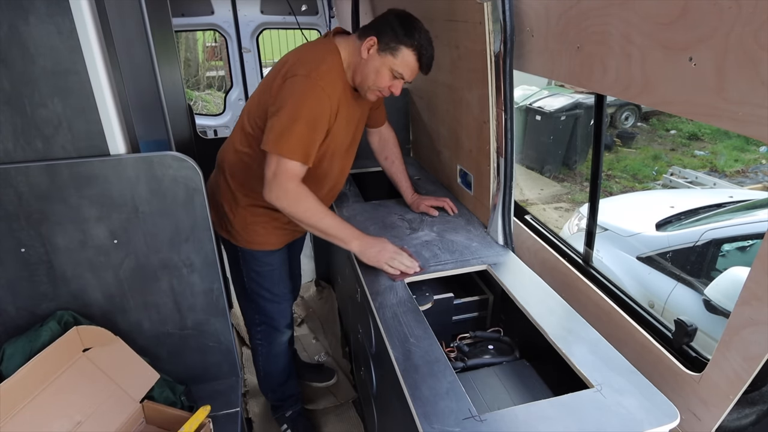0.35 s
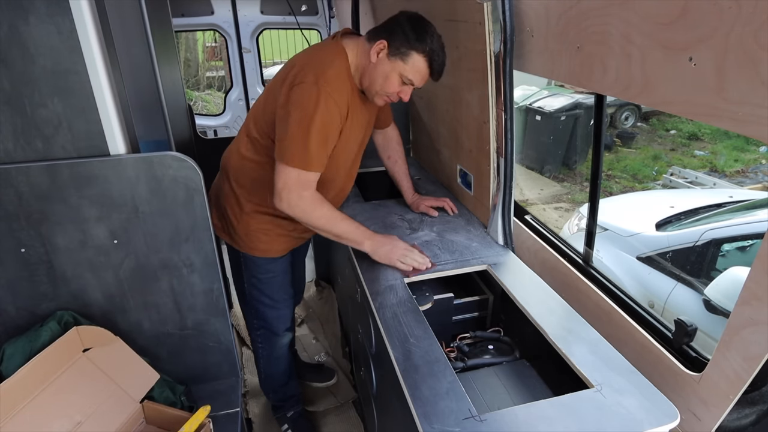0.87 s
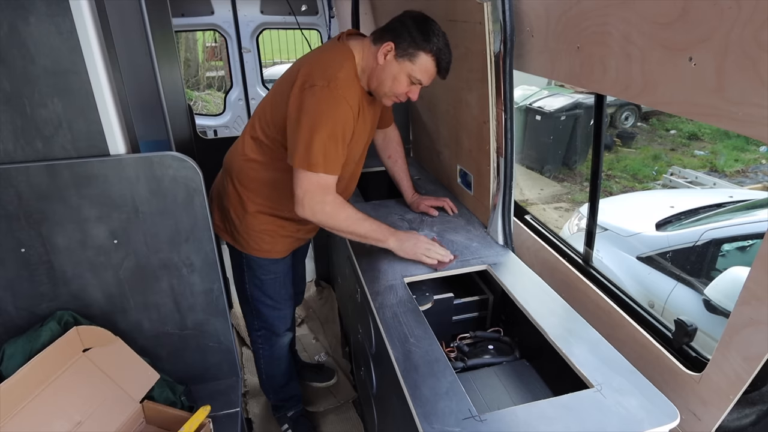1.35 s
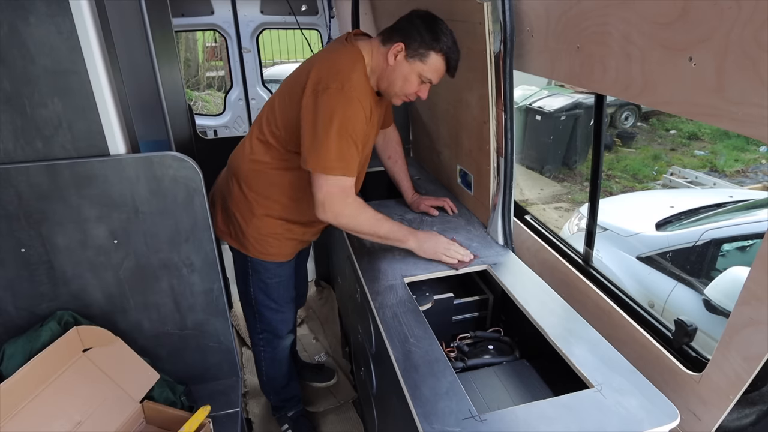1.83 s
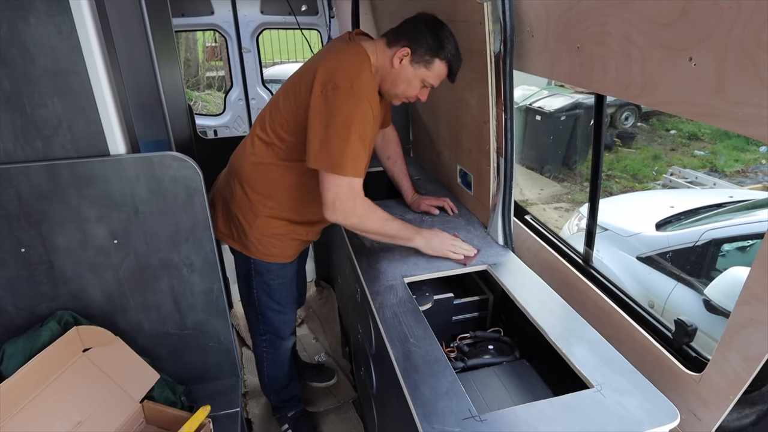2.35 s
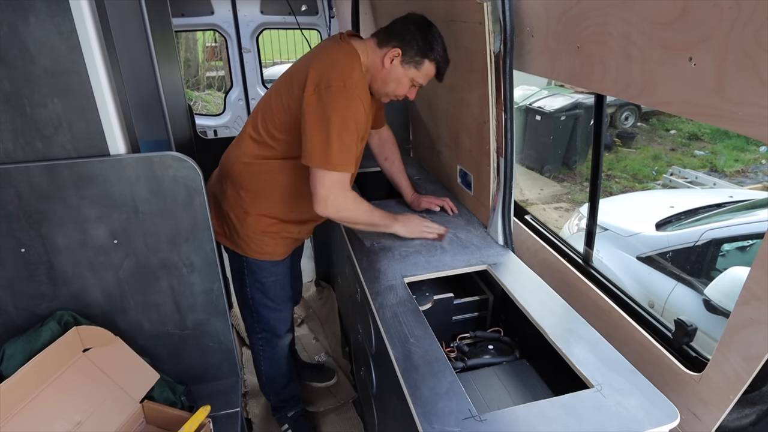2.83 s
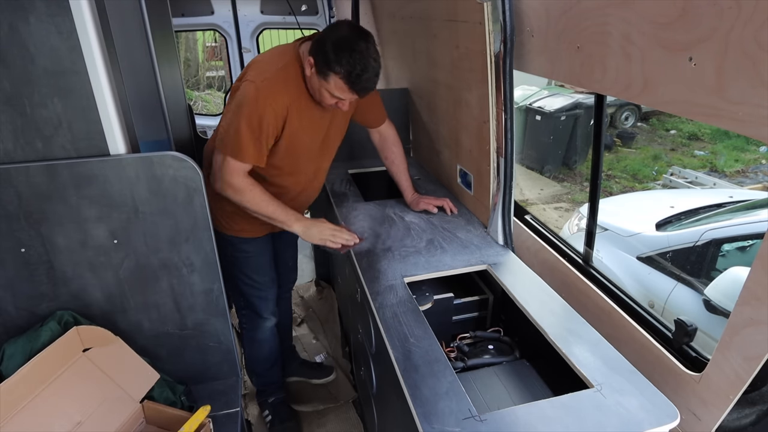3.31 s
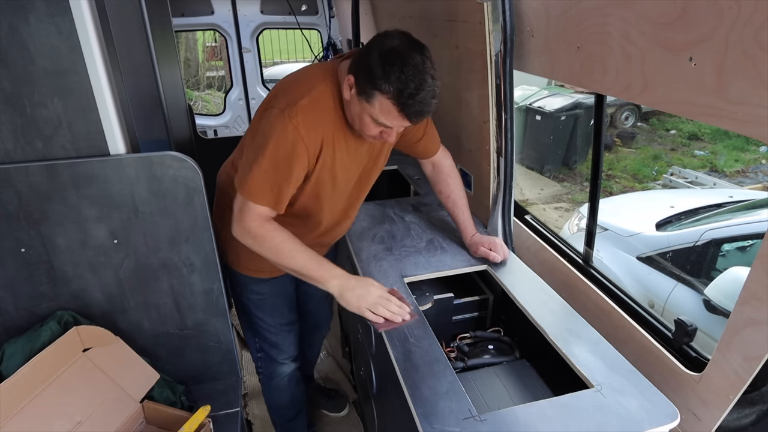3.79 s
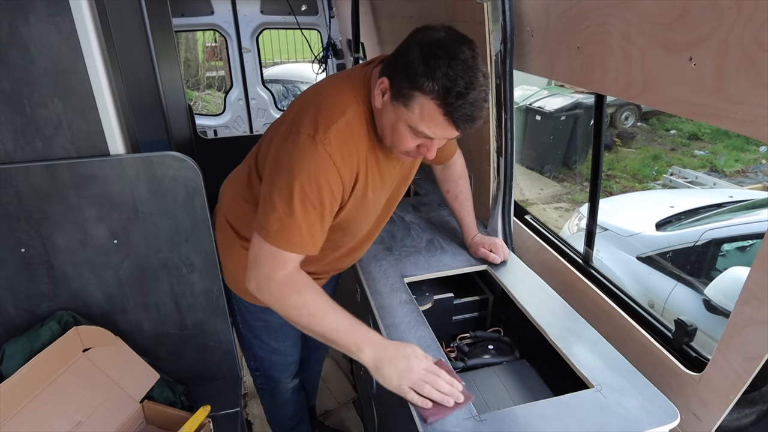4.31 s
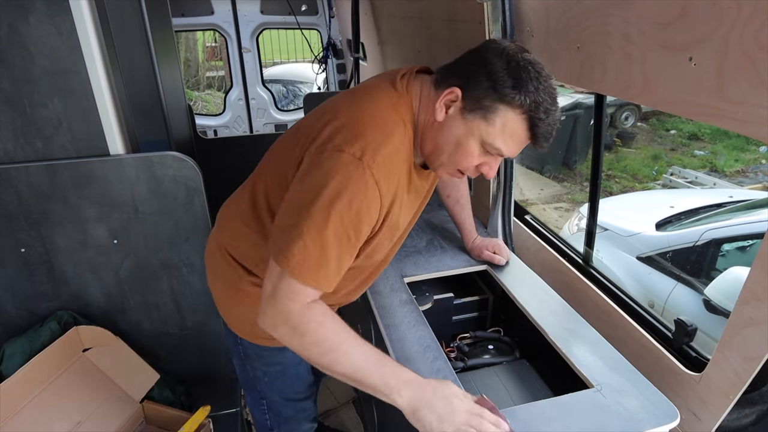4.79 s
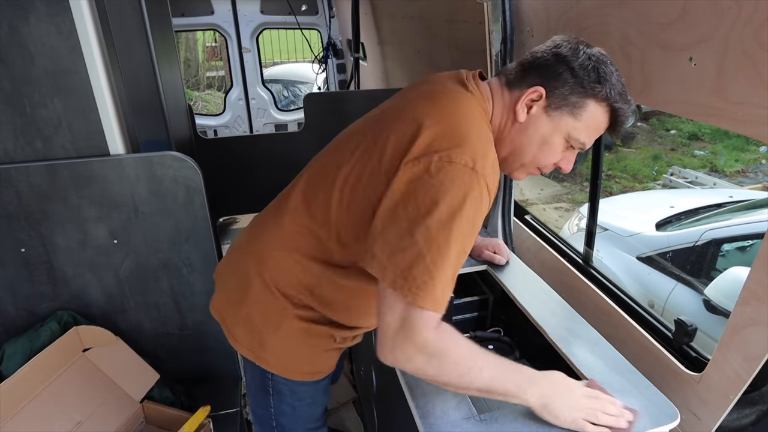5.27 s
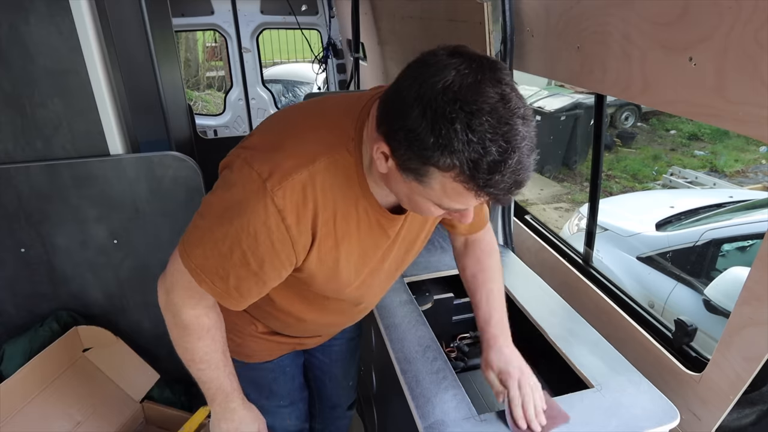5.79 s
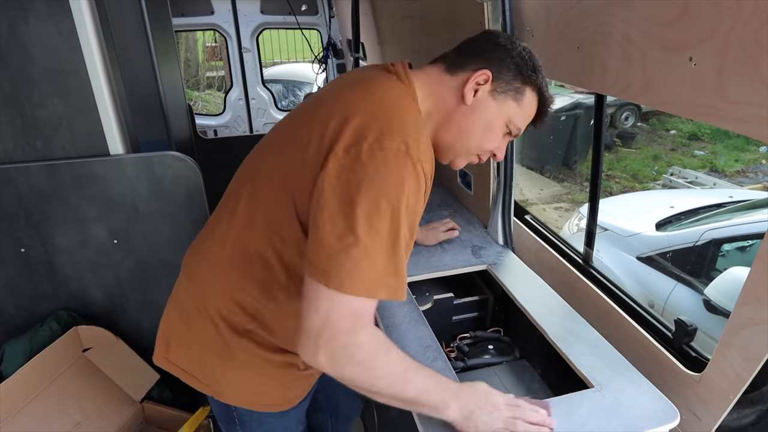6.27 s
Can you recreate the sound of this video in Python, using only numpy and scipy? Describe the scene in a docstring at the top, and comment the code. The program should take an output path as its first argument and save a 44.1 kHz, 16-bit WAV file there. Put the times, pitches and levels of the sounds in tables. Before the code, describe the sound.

Steady hand sanding inside a quiet van: bright gritty to-and-fro scratches, a brief gap late on, then slightly firmer strokes to the end.

```python
"""Hand sanding in a van

An abrasive sheet is rubbed by hand to and fro along a worktop edge inside a van, with one short pause.
Dense random grit clicks, filtered and swelling with each stroke, make the scratch.
The same clicks ring the edge and drum the cabinet below.
Low noise makes puffs of air on a mono microphone, over the quiet noise of the van.
"""
import sys
import numpy as np
from scipy import signal
from scipy.io import wavfile
from scipy.ndimage import uniform_filter1d

SR = 44100
rng = np.random.default_rng(int(sys.argv[2]) if len(sys.argv) > 2 else 0)


def inscribe(sig):
    """Save sig as 16-bit PCM at rate SR to the path in sys.argv[1].

    A 1-D sig is mono; a 2-D sig holds one channel per row.
    Samples are clipped to [-1, 1] before scaling.
    """
    pcm = np.round(np.clip(np.atleast_2d(sig).T, -1, 1) * 32767)
    wavfile.write(sys.argv[1], SR, pcm.astype(np.int16))


def ratio_of_db(decibels):
    """Turn decibels (scalar or array-like) into linear amplitude factors; 0 dB maps to 1."""
    return 10 ** (np.asarray(decibels, float) / 20)


N = 292824  # length in samples


def grit():
    """Grains of abrasive catch at random; the sheet grabs harder or softer in short steps."""
    per_s, spread_db = 16000, 1.5
    grab_db, grab_s = -0.92, 0.0082
    clicks = (rng.random(N) < per_s / SR) * rng.choice([-1., 1.], N)
    clicks *= ratio_of_db(spread_db * np.minimum(rng.exponential(1, N), 3))
    step = (np.arange(N) / SR / grab_s).astype(int)
    grabs = rng.standard_normal(2000)[step]
    return evened(clicks * ratio_of_db(grab_db * uniform_filter1d(grabs, size=40)))


# How deeply the many close room modes of the van ripple the spectrum, drifting slowly. # Each row: frequency in
# Hz, depth in dB.
VAN_RIPPLE = [(330, .5), (600, 3), (1500, 2.5), (3000, 1.4), (12000, 1)]


def van_modes(clicks):
    """The van's close room modes give narrow peaks and dips that last a few strokes."""
    def ripple(hz, frames):
        draw = rng.standard_normal((len(frames), len(hz)))
        return read(VAN_RIPPLE, hz)[:, None] * drifting(draw, frames_wide=30, bins_wide=2)

    return evened(shaped(clicks, ripple, size=2048))


# The strokes of the hand. Each row: time the hand turns in seconds, scratch level at the turn in dB,
# level at full speed in dB, share of the stroke (0 to 1) where full speed comes, sharpness of the grit in dB.
STROKES = [(0.0, -31, -34, 0.43, 0), (0.1, -35.9, -33.1, 0.65, 1.5), (0.21, -36, -33, 0.54, 0.6),
           (0.33, -33.5, -33.4, 0.48, 0.6), (0.395, -35.2, -32.5, 0.35, 1.0), (0.454, -36, -33.5, 0.61, 2),
           (0.535, -34.5, -32.5, 0.58, 0.5), (0.63, -35.9, -34, 0.35, -0.0), (0.733, -36, -33.9, 0.72, 1),
           (0.86, -37.2, -35.5, 0.5, -1), (0.913, -36, -34.5, 0.3, -1), (1.068, -36, -34.4, 0.6, -0.0),
           (1.152, -36, -34.2, 0.48, 0), (1.242, -36, -34.5, 0.5, -0.5), (1.367, -36.5, -33.4, 0.48, 0.5),
           (1.477, -39.5, -34, 0.57, 0.9), (1.611, -37, -34, 0.53, 1), (1.72, -36, -35, 0.53, 0.8),
           (1.796, -38.5, -34, 0.43, -1), (1.886, -37.5, -35, 0.75, 2), (1.99, -34, -35.5, 0.4, -0.5),
           (2.065, -36.6, -32.5, 0.46, 1.5), (2.14, -37.5, -32.5, 0.56, 2), (2.275, -36.5, -33.5, 0.4, 0.2),
           (2.415, -37, -33, 0.54, 2), (2.554, -37.1, -33, 0.55, -1.5), (2.659, -37, -31.5, 0.46, 1.1),
           (2.819, -37, -32, 0.53, 1.2), (2.943, -38.5, -33, 0.34, 1), (3.168, -35, -33.5, 0.55, 1),
           (3.317, -40.3, -32.5, 0.37, 1), (3.467, -38, -33.5, 0.62, 1), (3.58, -35, -34.5, 0.49, 0.5),
           (3.642, -38.0, -33, 0.51, 0.5), (3.746, -35.5, -33.5, 0.52, 1.3), (3.886, -37, -34, 0.7, 1.8),
           (4.006, -36.5, -34, 0.36, 2), (4.161, -37, -35.5, 0.58, 2.5), (4.27, -35.3, -33.5, 0.57, 1.3),
           (4.42, -38, -33, 0.35, 1), (4.555, -36, -31.5, 0.64, -2), (4.659, -35, -33.5, 0.2, -2),
           (4.734, -38.4, -33.5, 0.5, 1.3), (4.839, -34.5, -33.0, 0.74, -0.5),
           (4.969, -33.5, -33, 0.1, 0.5), (5.083, -35, -32.5, 0.63, 0.5), (5.273, -34, -32.6, 0.25, -0.5),
           (5.358, -38.8, -33.8, 0.4, -0.5), (5.56, -31, -32, 0.7, 2), (5.617, -32.5, -29.5, 0.56, 2.1),
           (5.715, -37.5, -32.5, 0.36, 1.9), (5.777, -36.7, -31.0, 0.51, 0),
           (5.922, -36.1, -33.7, 0.3, 0.7), (6.011, -36, -34.5, 0.37, 0.1), (6.116, -38, -33, 0.8, -0.5),
           (6.2, -31.5, -35.5, 0.9, -1), (6.27, -36, -32.5, 0.27, 2), (6.47, -36, -31.0, 0.53, 1),
           (6.7, -34.0, -33.0, 0.5, 1.0)]


def hand(t):
    """Scratch level in dB: an arch of speed from turn to turn, lowered further at the dropouts."""
    turn_s, turn_db, full_db, share, _ = np.transpose(STROKES)
    place = np.interp(t, turn_s, np.arange(len(turn_s)))
    stroke = place.astype(int)
    lean = np.log(.5) / np.log(np.clip(share, .1, .9))  # puts the top of the arch at its share
    arch = np.abs(np.sin(np.pi * (place % 1) ** lean[stroke])) ** 0.88  # under 1 the arch is squarer
    return (1 - arch) * np.interp(t, turn_s, turn_db) + arch * full_db[stroke] + dropouts(t)


# The scratch drops out: a short pause, a deep dip at a turn, and a brief cut near 6.2 s.
# Each row: start in seconds, fade in dB per second, deepest drop in dB,
# return in dB per second, end in seconds.
DROPOUTS = [(5.462, 410, 36, 40000, 5.5712), (5.594, 480, 14, 500, 5.642), (6.185, 1000, 29, 850, 6.245)]


def dropouts(t):
    """Change in dB where the scratch drops out: a straight fade, a floor and a straight return."""
    return -sum(np.clip(np.minimum(fade_db * (t - start), return_db * (end - t)), 0, deep_db)
                for start, fade_db, deep_db, return_db, end in DROPOUTS)


# The tone of the scratch. Each row: frequency in Hz, relative level in dB per Hz.
SCRATCH_TONE = [(350, -51), (600, -43), (700, -14), (880, -15), (1080, -10.5), (1500, -7.5), (1800, -6.5),
                (2900, -2), (3800, -2), (4340, 0), (5330, -0.5), (7400, -1.5), (8600, -2), (9800, -9),
                (13000, -12), (14500, -14), (15700, -20.5)]
# The hand leans in about every second stroke and the low scratch swells.
# Each row: time in seconds, swell in dB.
DRAGS = [(0.0, 0.5), (0.25, 1), (0.47, 2), (0.7, 3), (0.91, 5.5), (1.14, 4.5), (1.38, 7.5), (1.63, 8.5),
         (1.89, 4.5), (2.07, 3), (2.245, 5), (2.48, 7.3), (2.77, 5.5), (2.92, 3.5), (3.14, 3), (3.32, 3),
         (3.46, 4), (3.7, 6), (3.87, 5), (4.03, 6.5), (4.235, 8.5), (4.49, 7), (4.74, 8.5), (4.9, 6.5),
         (5.05, 5.5), (5.36, 4.5), (5.6, 1), (5.93, 5), (6.08, 3.5), (6.28, 6.5), (6.505, 6), (6.64, 7)]


def scratch(drive):
    """The grit heard through the air; its colour drifts in patches as the sheet bends."""
    drag_s, drag_rest_db = 0.17, -5

    def colour(hz, frames):
        turn_s, *_, sharp = np.transpose(STROKES)
        middle_s = (turn_s[:-1] + turn_s[1:]) / 2
        sharp_db = np.interp(frames, middle_s, sharp[:-1])
        at_s, lean_db = np.transpose(DRAGS)
        away = 2 * (frames[:, None] - at_s) / drag_s
        drag_db = drag_rest_db + (lean_db * np.exp(-away ** 2)).sum(axis=1)
        patches = rng.standard_normal((len(frames), len(hz)))
        quick = drifting(patches, frames_wide=16, bins_wide=5)
        slow = drifting(patches, frames_wide=140, bins_wide=8)
        top = np.clip((hz[:, None] - 7500) / 3000, 0, 1)
        bottom = np.clip((1900 - hz[:, None]) / 500, 0, 1)
        moves = top * sharp_db + bottom * drag_db
        return read(SCRATCH_TONE, hz)[:, None] + moves + 0.85 * quick + 0.59 * slow

    return ratio_of_db(0.01) * evened(shaped(drive, colour, size=512))


# The edge rings in a band that shifts with the place of the hand.
# Each row: time in seconds, frequency in Hz, width in Hz, level over the scratch in dB.
EDGE = [(0, 2750, 500, -22), (1.2, 2740, 500, -26), (1.32, 1890, 300, -34), (1.42, 1800, 280, -19),
        (2.0, 1820, 280, -19), (2.62, 1840, 300, -19), (2.72, 1960, 450, -20), (2.9, 1960, 400, -21),
        (3.0, 1800, 450, -24), (3.1, 2870, 500, -43), (3.27, 3000, 500, -18), (3.85, 2530, 550, -24.5),
        (4.5, 2230, 500, -16.5), (5.3, 2380, 550, -21), (5.7, 2730, 600, -29), (6.3, 2600, 700, -21),
        (6.64, 2650, 750, -21)]
# Two rubs ring the edge harder. Each row: time in seconds, length in seconds, extra level in dB.
HARD_RUBS = [(2.746, .08, 9), (2.884, 0.055, 10.5)]


def edge(drive, t):
    """A ring of the edge strip that wavers and comes in patches; a narrow and a broad mode share it."""
    narrow_hz, broad_hz = 250, 750  # widths of the two modes
    hz, width, level_db = curves(EDGE, t)
    for at_s, length, extra_db in HARD_RUBS:
        level_db = level_db + extra_db * np.exp(-(2 * (t - at_s) / length) ** 2)
    waver, patchy = (evened(uniform_filter1d(v, size=2500)) for v in rng.standard_normal((2, N)))
    wavering_hz = hz * (1 + 0.02 * waver)
    narrow = evened(resonate(drive, wavering_hz, narrow_hz))
    broad = evened(resonate(drive, wavering_hz, broad_hz))
    share = np.clip((width - narrow_hz) / (broad_hz - narrow_hz), 0, 1)
    return ratio_of_db(level_db + 1.5 * patchy) * ((1 - share) * narrow + share * broad)


# Each push of the hand drums the cabinet.
# Each row: time in seconds, length in seconds, carcass level in dB, top panel level in dB.
PUSHES = [(0.195, 0.15, -62.5, -74), (0.437, 0.14, -61.0, -66), (0.666, 0.22, -64, -64.5),
          (0.906, 0.11, -57, -62.0), (1.147, 0.13, -56, -58.5), (1.362, 0.13, -56.5, -63.0),
          (1.605, 0.14, -57, -57.5), (1.84, 0.17, -57.5, -62), (2.14, 0.29, -60.5, -63.5),
          (2.39, 0.17, -60, -64.0), (2.623, 0.11, -56, -61.5), (2.824, 0.09, -58.5, -74),
          (2.954, 0.11, -61, -63), (3.118, 0.09, -68, -60.5), (3.317, 0.07, -60, -71),
          (3.728, 0.15, -60.5, -58.5), (3.977, 0.19, -57.0, -57.0), (4.107, 0.14, -64, -63),
          (4.276, 0.26, -60.5, -56), (4.503, 0.074, -61.0, -58), (4.739, 0.18, -57.5, -55.5),
          (5.04, 0.24, -57, -55), (5.28, 0.2, -63, -56), (5.606, 0.19, -66, -61),
          (5.684, 0.12, -60.0, -58.5), (5.96, 0.25, -60.5, -57), (6.31, 0.12, -62.0, -58.5),
          (6.513, 0.14, -63.5, -57)]
# The balance of high and low drumming shifts as the hand moves; above zero favours the small, high panels.
# Each row: time in seconds, carcass tilt in dB per octave, top panel tilt in dB per octave.
PLACE = [(0, -4.5, -2), (1, -3.5, 1), (2, -7.5, 1), (2.6, -0.5, -1), (3.2, -2, -2), (3.7, -8.5, -3),
         (4.0, 6, 4), (4.3, 12, 3), (5, 6, -2), (5.6, -2, -1), (6, 9, -2), (6.64, -6, 0)]
# Modes of the cabinet's carcass. Each row: frequency in Hz, width in Hz, relative level in dB.
CARCASS = [(110, 11, -9.5), (188.4, 23, 0.5), (219, 21.6, 0.5), (258.4, 18, 2.5), (314.4, 32, 2.5)]
# Modes of the top panel. Each row: frequency in Hz, width in Hz, relative level in dB.
PANEL = [(404, 54, 5), (488.6, 103, 6.5), (565, 170, 6), (877, 270, 3.5)]


def cabinet(drive, t):
    """Carcass and top panel modes rung by the rubbing."""
    rest_levels_db = -78, -76  # carcass, top panel
    dropout_share = .3  # share of a dropout's dB that reaches the cabinet
    coarse = t[::100]
    at_s, length_s, *push_levels_db = np.transpose(PUSHES)
    parts = zip(push_levels_db, rest_levels_db, (CARCASS, PANEL), curves(PLACE, t))
    sound = 0
    for push_db, rest_db, modes, slope_db in parts:
        level_db = np.interp(t, coarse, swells(coarse, at_s, length_s, push_db, rest_db))
        sound = sound + ratio_of_db(level_db) * ring(drive, modes, slope_db)
    return ratio_of_db(dropout_share * dropouts(t)) * sound


# The strongest puffs of air on the microphone. Each row: time in seconds, length in seconds, level in dB.
PUFFS = [(.15, .25, -80), (.87, .15, -79), (1.2, .22, -78), (1.42, .12, -79), (1.62, .1, -85),
         (1.87, .12, -85), (2.1, .15, -88), (2.3, .1, -90), (3.0, .1, -79), (3.3, .15, -80),
         (3.936, .06, -54), (4.07, .16, -68), (4.25, .1, -72), (4.92, .12, -68), (5.1, .1, -71),
         (5.25, .15, -79), (5.65, .3, -82), (6.28, .07, -66), (6.482, .12, -69)]
# Faint air between puffs. Each row: time in seconds, level in dB.
DRAUGHT = [(0, -97), (2.42, -102), (2.55, -88), (3.8, -83), (4.6, -84), (5.4, -85), (6.64, -84)]


def puffs(t):
    """Air pushing on the microphone: lumpy low noise that swells at each puff."""
    band = signal.butter(2, [14, 52], "band", fs=SR, output="sos")
    low = signal.sosfilt(band, rng.standard_normal(N))
    coarse = t[::100]
    level_db = swells(coarse, *np.transpose(PUFFS), curves(DRAUGHT, coarse)[0])
    return ratio_of_db(np.interp(t, coarse, level_db)) * evened(low)


# The tone of the quiet background. Each row: frequency in Hz, relative level in dB per Hz.
HUSH_TONE = [(20, -42), (70, -25), (110, -13.5), (400, -6.5), (700, -9), (3000, -16.5), (8000, -33),
             (16000, -48)]


def hush():
    """The quiet background of the open van: steady noise, mostly low and middle tones."""
    noise = shaped(rng.standard_normal(N), lambda hz, t: read(HUSH_TONE, hz)[:, None], size=4096)
    return ratio_of_db(-64) * evened(noise)


def evened(x):
    """Scales to rms 1."""
    return x / np.sqrt(np.mean(x ** 2) + 1e-20)


def read(points, hz):
    """Reads a table on a log-frequency axis."""
    f, value = np.transpose(points)
    return np.interp(np.log(hz + 1), np.log(f + 1), value)


def curves(rows, t):
    """Reads every column of a table at the times t."""
    s, *columns = np.transpose(rows)
    return [np.interp(t, s, c) for c in columns]


def swells(t, at_s, length_s, peak_db, rest_db):
    """Bell-shaped swells, 5.2 dB down half a length from the peak, over a resting level."""
    away = 2 * (t[:, None] - np.asarray(at_s)) / np.maximum(length_s, .02)
    power = (ratio_of_db(np.asarray(peak_db) - 5.2 * away ** 2) ** 2).sum(axis=1)
    return 10 * np.log10(power + ratio_of_db(rest_db) ** 2)


def drifting(draw, frames_wide, bins_wide):
    """Smooths random draws over time and frequency into patches of rms 1."""
    over_time = uniform_filter1d(draw, size=frames_wide, axis=0, mode="wrap")
    return evened(uniform_filter1d(over_time, size=bins_wide, axis=1)).T


def shaped(x, field_db, size):
    """Multiplies the short-time spectrum by a dB field built from frequency and time."""
    hz, t, z = signal.stft(x, SR, nperseg=size, noverlap=size * 3 // 4)
    return signal.istft(z * ratio_of_db(field_db(hz, t)), SR, nperseg=size, noverlap=size * 3 // 4)[1][:N]


def resonate(x, hz, width):
    """A resonance that can glide: shifts the curve hz down to zero, smooths twice, and shifts back."""
    turn = np.exp(2j * np.pi * np.cumsum(hz * np.ones(N)) / SR)
    r = np.exp(-np.pi * width / SR)
    once = signal.lfilter([1 - r], [1, -r], x / turn)
    twice = signal.lfilter([1 - r], [1, -r], once)
    return 2 * (turn * twice).real


def ring(drive, modes, slope_db):
    """Rings a set of modes at about rms 1, tilted around the second towards the high or low ones."""
    gains = [ratio_of_db(db + slope_db * np.log2(hz / modes[1][0])) for hz, _, db in modes]
    sound = sum(g * evened(resonate(drive, hz, width)) for g, (hz, width, _) in zip(gains, modes))
    return sound / np.sqrt(sum(g ** 2 for g in gains))


def scene():
    """Mixes all sources, alike in both channels."""
    t = np.arange(N) / SR
    drive = van_modes(grit())
    stroke_db = hand(t)
    air = scratch(drive) + edge(drive, t)
    dull = signal.sosfiltfilt(signal.butter(1, 6000, fs=SR, output="sos"), air)
    speed = np.clip((stroke_db + 71) / 22, 0, 1)  # a slowing sheet loses its treble first
    rubbing = ratio_of_db(stroke_db) * (speed * air + (1 - speed) * dull)
    low_cut = signal.butter(3, 75, "high", fs=SR, output="sos")
    solid = signal.sosfilt(low_cut, rubbing + cabinet(drive, t) + hush())
    mono = solid + puffs(t)
    return np.array([mono, mono])


def low_pass(x):
    """Removes everything above the highest recorded frequency."""
    return signal.sosfilt(signal.butter(12, 16580, fs=SR, output="sos"), x)


def record(dry):
    """Filters off the treble above about 15780 Hz and finishes the mix."""
    limit = signal.firwin(801, 15780, window=("kaiser", 8), fs=SR)
    mix = signal.oaconvolve(dry, limit[None], "same")
    return low_pass(mix)


dry = scene()
out = record(dry)
inscribe(out)
```